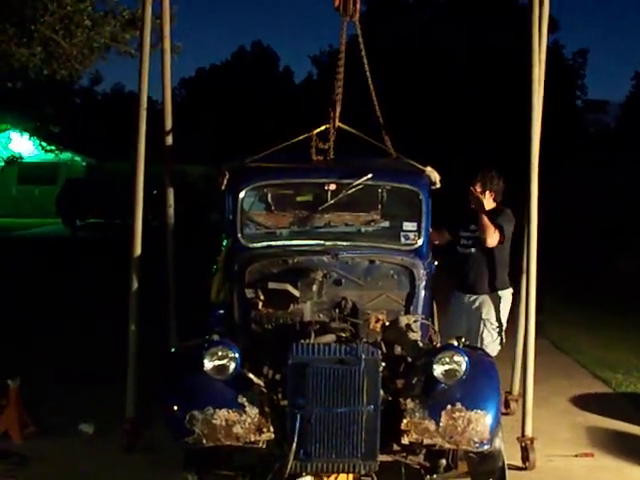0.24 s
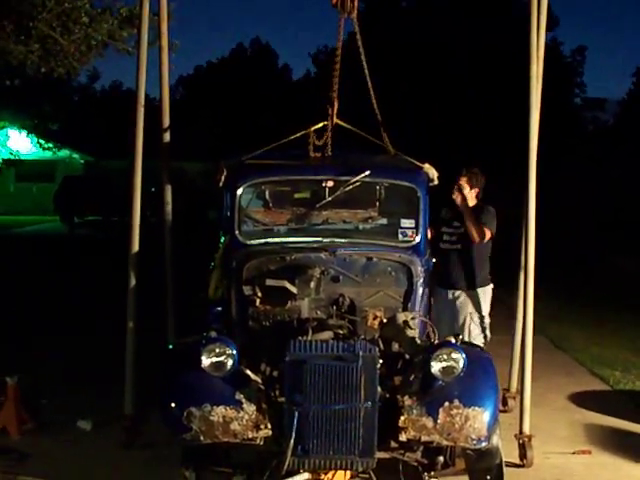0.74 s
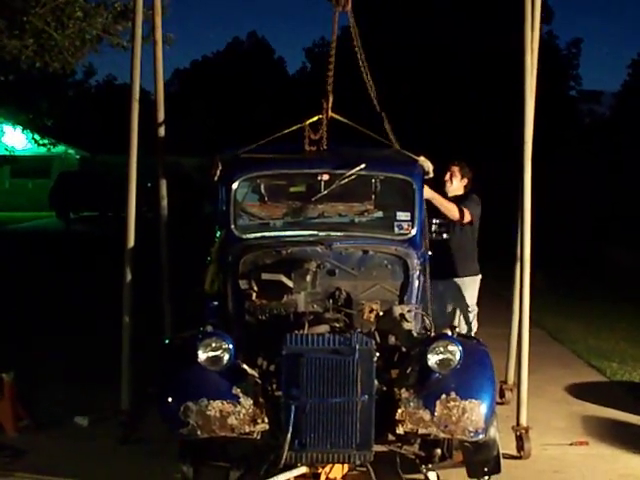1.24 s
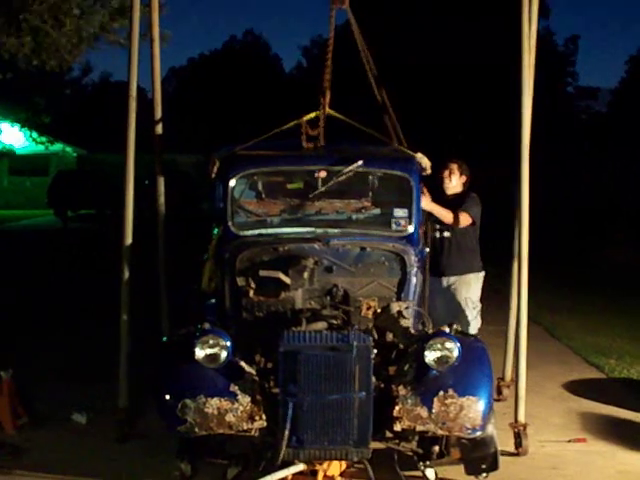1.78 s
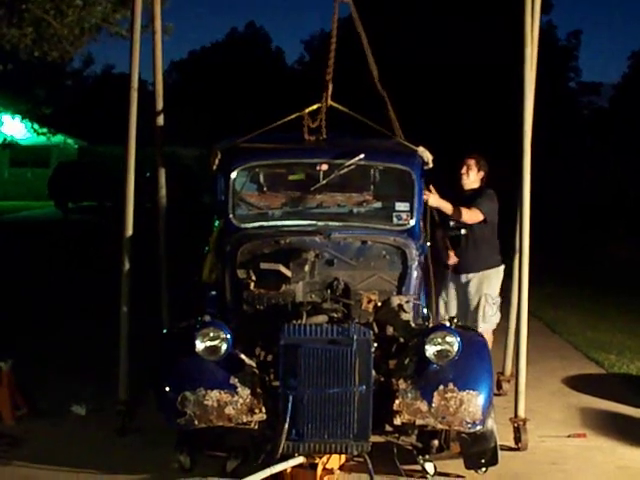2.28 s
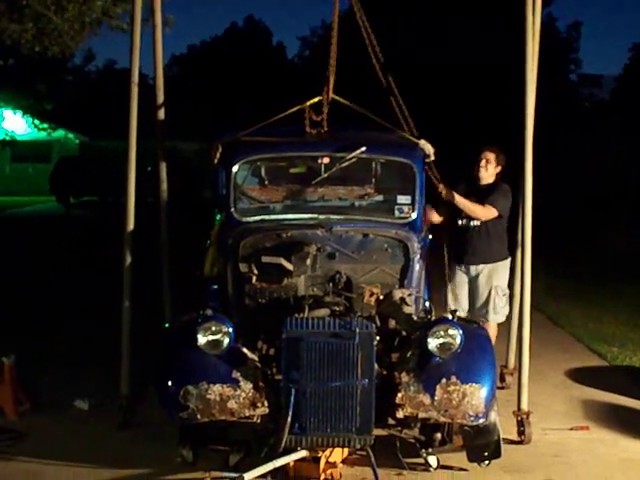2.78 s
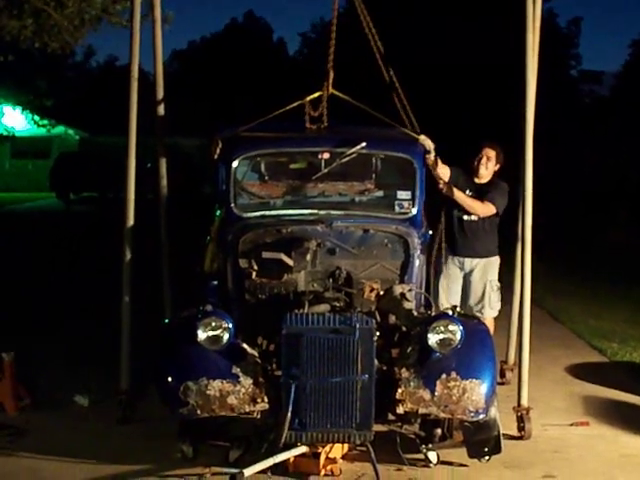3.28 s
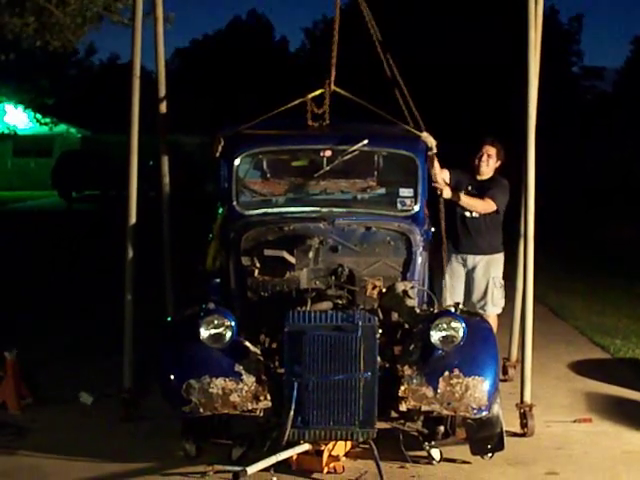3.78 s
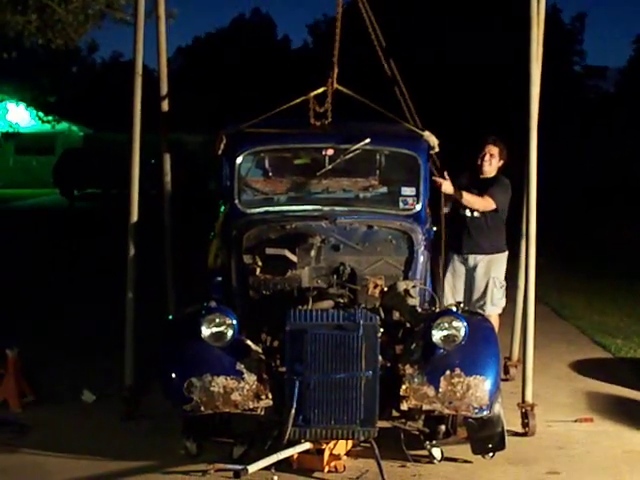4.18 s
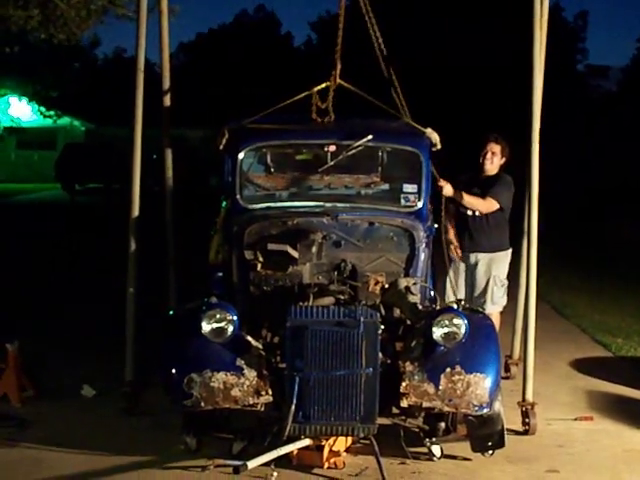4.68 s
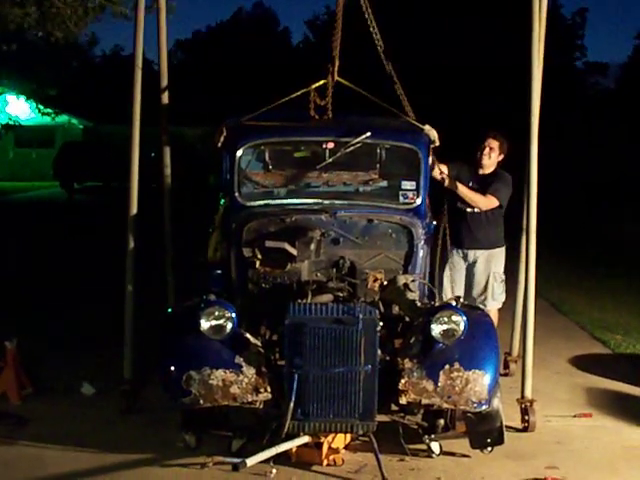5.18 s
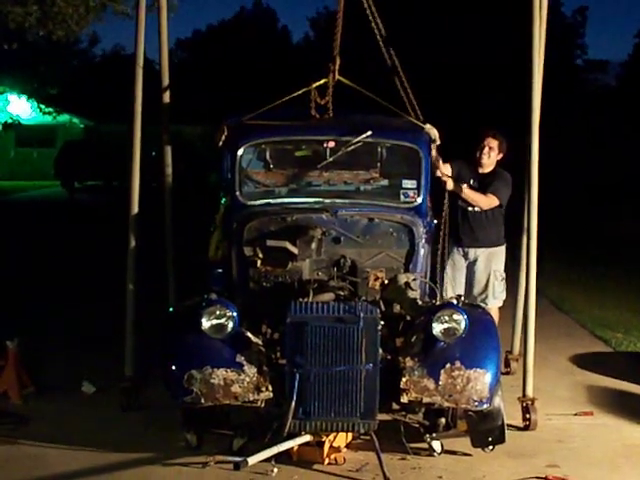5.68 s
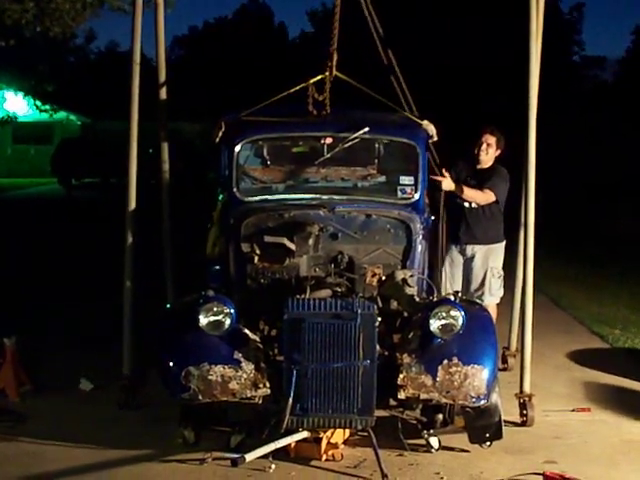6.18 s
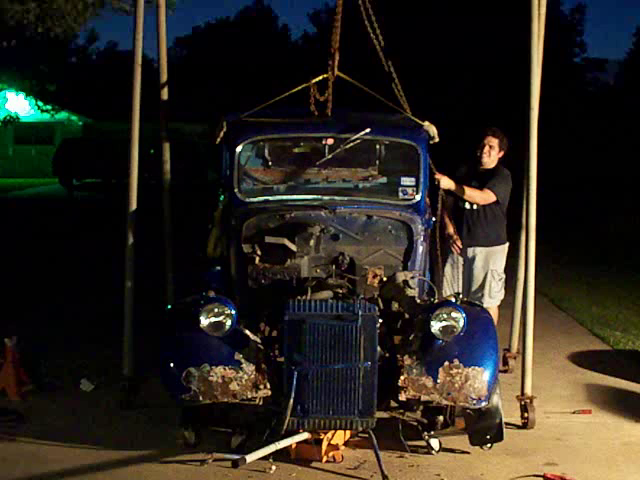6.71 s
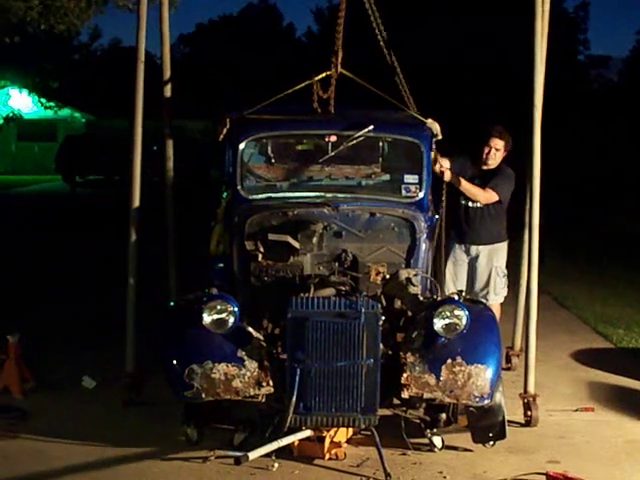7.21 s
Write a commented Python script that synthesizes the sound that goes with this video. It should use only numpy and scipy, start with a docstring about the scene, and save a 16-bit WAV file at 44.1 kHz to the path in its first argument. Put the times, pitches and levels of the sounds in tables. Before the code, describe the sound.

Outdoors at night, a hand chain hoist is pulled three times. Each pull is a run of bright, irregular link clinks, about twenty-five a second, over a ringing wheel. Between pulls the slack chain slaps and scuffs the sheet metal of the hanging old vehicle, with soft hollow jolts. Faint crickets and a low distant hum lie behind. A small camera microphone a few metres away hears short echoes off paving and walls, with dulled top treble.

```python
"""A hand chain hoist in a yard at night: in three pulls the links drop one by one into the wheel's pockets.
Between pulls the slack chain slaps the sheet metal of the hanging load, which also jolts in its slings.
Each contact is a short flurry of noise impacts that drives resonances of link, wheel and sheet metal.
Walls and paving answer; a near cricket, far crickets, a far hum and two thin whistles lie behind.
A small camera microphone with a notch in its treble listens."""
import sys
import numpy as np
from scipy import signal
from scipy.fft import rfft, irfft, next_fast_len
from scipy.io import wavfile
from scipy.ndimage import map_coordinates

SR = 44100
rng = np.random.default_rng(int(sys.argv[2]) if len(sys.argv) > 2 else 0)


def put_to_file(sound):
    """Save the sound as 16-bit audio at rate SR, in the file named by the first command-line argument."""
    columns = np.atleast_2d(sound).T  # one column per channel
    safe = np.clip(columns, -1, 1)
    whole_steps = np.round(safe * 32767)
    wavfile.write(sys.argv[1], SR, whole_steps.astype(np.int16))


N = 328545


def amp(db):
    """Decibels to linear gain."""
    return 10 ** (np.asarray(db) / 20)


def unit(x):
    """x scaled to rms 1."""
    return x / np.sqrt(np.mean(x ** 2) + 1e-20)


def along(points, hz):
    """Read (frequency, value) points on a log frequency axis."""
    f, v = np.transpose(points)
    return np.interp(np.log(hz + 1), np.log(f + 1), v)


def gains(tables):
    """One gain per sample for each level column; silent outside the tables."""
    t, out = np.arange(N) / SR, 0
    for rows in tables:
        start_s, *levels = np.transpose(rows)
        out = out + np.array([amp(np.interp(t, start_s, db, -150, -150)) for db in levels])
    return out


def wobble(rate):
    """A smooth random curve, rate knots a second."""
    knots = rng.standard_normal(int(N * rate / SR) + 4)
    return map_coordinates(knots, [np.arange(N) * rate / SR])


def filtered(x, response):
    """x times a complex response of frequency."""
    m = next_fast_len(N + SR // 2)
    return irfft(rfft(x, m) * response(np.fft.rfftfreq(m, 1 / SR)), m)[..., :N]


def coloured(x, spectrum):
    """x through a spectrum, scaled so that white noise keeps its rms."""
    hz = np.linspace(0, SR / 2, 2048)
    noise_gain = np.sqrt(np.mean(amp(along(spectrum, hz)) ** 2))
    return filtered(x, lambda f: amp(along(spectrum, f))) / noise_gain


def ringing(x, modes):
    """x through causal resonances of alternating sign, scaled so that white noise keeps its rms."""
    def response(f):
        total = 0
        for k, (hz, width, db) in enumerate(modes):
            damping = 1j * f * width
            total = total + (-1) ** k * amp(db) * damping / (hz * hz - f * f + damping)
        return total

    noise_gain = np.sqrt(np.mean(abs(response(np.linspace(0, SR / 2, 8192))) ** 2))
    return filtered(x, response) / noise_gain


def mode(x, hz, width_hz):
    """x through one resonance, scaled so that white noise keeps its rms."""
    b, a = signal.iirpeak(hz, hz / width_hz, SR)
    return signal.lfilter(b, a, x) * np.sqrt(SR / np.pi / width_hz)


def impacts(spread_db):
    """Dense tiny impacts of uneven size, rms 1."""
    return unit(rng.standard_normal(N) * amp(spread_db * wobble(400)))


def flurry(rise_ms, t60_ms):
    """Envelope of a flurry of tiny impacts that swells, then dies."""
    ms = np.arange(SR // 4) / SR * 1000
    swell = (1 - np.exp(-ms / max(rise_ms, .2))) ** 1.26
    return swell * amp(-60 * ms / max(t60_ms, 10))


def add(track, s, sound):
    """Lay a sound into a track, s seconds in."""
    track[round(s * SR):][:len(sound)] += sound


# Far hum and air: pitch_hz, level_db (per Hz, relative)
NIGHT_SPECTRUM = [(12, -33), (20, -22), (98, -13.5), (163, -6), (286, -8.5), (342, -6.5), (570, -8),
                  (699, -4.5), (1000, -11.5), (3240, -20.5), (3590, -22.5), (4290, -31.5), (6800, -16.5),
                  (8130, -26.5), (9010, -47.5), (11700, -59.5), (19800, -120)]
# Thin whistles: pitch_hz, level_db (rms, before their slow unevenness)
WHISTLE_TONES = [(7827, -81), (8172, -85)]
HUM_DB = -60.5  # far traffic


def night():
    """Far traffic hum and air as shaped noise, slowly uneven, with two thin wavering whistles."""
    t = np.arange(N) / SR
    whistles = 0
    for pitch_hz, level_db in WHISTLE_TONES:
        whistles = whistles + np.sqrt(2) * amp(level_db + wobble(3.7)) * np.sin(2 * np.pi * pitch_hz * t)
    hum = amp(HUM_DB + 0.47 * wobble(1.8)) * coloured(rng.standard_normal(N), NIGHT_SPECTRUM)
    return hum + whistles


# Far crickets, level points: start_s, level_db
FAR_CHORUS = [(0, -90), (.6, -95), (2.6, -76), (3.5, -76.5), (4.8, -76), (5.7, -75), (6.8, -73),
              (7.0, -73.5), (7.45, -74)]
# Near cricket, chirps: start_s
NEAR_CHIRPS = [.06, .3, .55, .79, 1.04, 1.28, 1.51, 2.93, 3.39, 3.6, 4.86, 5.08, 5.5, 5.71, 6.85, 7.06, 7.3]
CHIRP_DB = -67


def crickets():
    """A near cricket scrapes trains of pulses; far ones merge into a narrow band of noise."""
    t, gate = np.arange(N) / SR, np.zeros(N)
    for start_s in NEAR_CHIRPS:
        u = np.clip((t - start_s) / 0.12, 0, 1)  # a chirp lasts 0.12 s
        gate += amp(CHIRP_DB) * np.abs(np.sin(np.pi * u)) ** 0.2 * (u < 1)
    strokes = 1 + 0.47 * np.sin(2 * np.pi * 45 * t + wobble(5.4))  # about 45 a second
    near = ringing(gate * strokes * rng.standard_normal(N), [(6970, 27, 0)])
    band = ringing(rng.standard_normal(N), [(3520, 74, 0)])
    far = gains([FAR_CHORUS])[0] * amp(1.5 * wobble(4.7)) * band
    return near + far


# Echo of the yard: pitch_hz, t60_s
YARD_DECAY = [(200, 1), (1400, 0.37), (4000, 0.38), (9000, 0.26)]


def yard(x):
    """Walls, paving and hanging steel answer; each frequency dies at its own speed."""
    hz, t, z = signal.stft(rng.standard_normal(SR // 2), SR, nperseg=256)
    decay = amp(-60 * t / along(YARD_DECAY, hz)[:, None])
    tail = signal.istft(z * decay, SR, nperseg=256)[1]
    delayed = np.pad(x, (400, 0))  # the echo starts 9 ms late
    return signal.fftconvolve(delayed, tail / np.linalg.norm(tail))[:N]


# Sheet metal of the load, clear modes: pitch_hz, width_hz, level_db (relative)
PANEL_MODES = [(356, 15, -17), (756, 12, 7.5), (851, 27, -1.5), (1205, 48, 7.5), (1370, 180, -14),
               (1678, 45, 9.5), (2324, 110, -13), (2670, 58, -8.5), (3144, 30, -15)]
# Sheet metal of the load, dense modes: pitch_hz, level_db (per Hz, relative)
SHEET_SPECTRUM = [(130, -42), (220, -12), (576, 0), (1250, -0.5), (1460, 0), (2560, -5.5), (2850, -9),
                  (3230, -11.5), (4140, -27.5), (4770, -16.5), (7480, -10.5), (9010, -60), (11700, -74),
                  (19800, -120)]


def load(knock):
    """Knocks ring the few clear modes of the sheet metal and colour its many dense ones."""
    return amp(-8.5) * ringing(knock, PANEL_MODES) + amp(-2) * coloured(knock, SHEET_SPECTRUM)


# Hollow body of the load: pitch_hz, level_db (per Hz, relative)
BODY_SPECTRUM = [(35, -62.5), (60, -30), (134, -15), (166, -11), (279, -7), (784, 0), (879, -1.5),
                 (2720, -13), (3000, -16.5), (3900, -41), (6600, -120)]
# The load jolts in its slings: start_s, level_db (relative), rise_ms, t60_ms, boom_pitch_hz,
# boom_level_db (relative)
JOLTS = [(0.428, -43, 17, 360, 303, -81), (1.899, -51, 10, 320, 235.7, -60),
         (2.13, -31, 2, 124, 234, -54.5), (4.293, -32, 5.3, 300, 315, -54),
         (4.601, -26.5, 15, 270, 140.5, -57.5), (4.818, -41.5, 4.9, 92, 252, -78),
         (5.884, -39, 5.2, 330, 228, -59)]


def thuds():
    """Soft jolts rumble and boom in the hollow body."""
    push, boom, t = np.zeros(N + SR), np.zeros(N + SR), np.arange(SR // 4) / SR
    for start_s, level_db, rise_ms, t60_ms, boom_hz, boom_db in JOLTS:
        add(push, start_s, amp(level_db - 6) * flurry(rise_ms, t60_ms))
        add(boom, start_s, amp(boom_db + 4) * flurry(12, 350) * np.sin(2 * np.pi * boom_hz * t))
    push = push[:N] * impacts(spread_db=2.5)
    return coloured(push, BODY_SPECTRUM) + amp(-5.5) * ringing(push, PANEL_MODES) + boom[:N]


# Single dry ticks of one link: start_s, level_db (relative), pitch_hz, crack_db (over the ring)
LINK_TICKS = [(1.484, -31.5, 1460, 5), (1.566, -34, 2890, -7), (2.781, -50, 1170, 2),
              (4.7717, -43, 2600, -3), (4.8228, -44, 990, 22), (4.853, -53, 1180, -3),
              (5.0335, -41, 1060, -9), (5.4182, -36.5, 1030, 17), (5.6316, -44, 1970, -11),
              (5.732, -34, 2700, 0), (6.7056, -28, 2820, -2)]


def ticks():
    """One link touches another: a crack and a few cycles of ring, with softened treble."""
    out, t = np.zeros(N + SR), np.arange(SR // 20) / SR
    for start_s, level_db, pitch_hz, crack_db in LINK_TICKS:
        crack = amp(crack_db - 60 * t / 0.002) * rng.standard_normal(len(t))
        ring = amp(-60 * t / 0.019) * np.sin(2 * np.pi * pitch_hz * t)
        add(out, start_s, amp(level_db - 8.0) * (ring + crack))
    return filtered(out[:N], lambda f: 1 / (1 + 1j * f / 4500))


# The wheel sings as the slack is taken up: start_s, length_s, pitch_hz, level_db (before the flutter)
TAKE_UP_TONES = [(1.514, .13, 2074, -66), (3.537, 0.29, 2036, -66.5), (5.62, 0.27, 1943, -68.5)]


def take_up():
    """A thin, unsteady tone of the rim as each pull takes up the slack."""
    t = np.arange(N) / SR
    cycles = np.cumsum(np.exp(.02 * wobble(30))) / SR
    tones = 0
    for start_s, length_s, pitch_hz, level_db in TAKE_UP_TONES:
        fade = np.clip(np.minimum(t - start_s, start_s + length_s - t) / .015, 0, 1)
        tones = tones + amp(level_db) * fade * np.sin(2 * np.pi * pitch_hz * cycles)
    return tones * amp(4.5 * wobble(45)) * np.sqrt(2)


# Hoist wheel and cover: pitch_hz, width_hz, level_db (relative)
WHEEL_MODES = [(636.3, 26.5, -8.5), (903, 22, -16.5), (1183, 41, -6.5), (1698, 83, -3), (1840, 57, -24),
               (2550, 33, -8), (2847, 74, 1.5), (3023, 84, 1), (3037, 28, -13), (3642, 50, -5),
               (4633, 44, -8.5), (5580, 100, -5), (7270, 24, -33), (7240, 22, -14)]
# The purest ring of the wheel: pitch_hz, width_hz, level_db
RIM_MODE = [(2055, 27, 0)]
RIM_HUM_DB = -1.5  # running ring of the rim, over the drive of the wheel


def wheel(shake, running):
    """As the wheel turns, links strike new places and favour other modes; the running chain hums the rim."""
    shaken = shake * impacts(spread_db=4.0)
    ring = 0
    for pitch_hz, width_hz, level_db in WHEEL_MODES:
        ring = ring + amp(level_db - 6.5 + 1.9 * wobble(22)) * mode(shaken, pitch_hz, width_hz)
    return ring + ringing(amp(RIM_HUM_DB) * running * impacts(spread_db=1.0), RIM_MODE)


# Links: pitch_hz, level_db (per Hz, relative)
CLINK_SPECTRUM = [(180, -35.5), (300, -16), (460, -63), (611, -8), (1540, -5.5), (2020, 3.5), (2360, -6.5),
                  (3050, 1), (4180, -10), (4550, -6.5), (7070, 4.5), (8040, -2.5), (9010, -42),
                  (11700, -83.5), (19800, -120)]
# Bunched slack links: pitch_hz, width_hz, level_db
SLACK_MODE = [(2570, 410, 0)]


def links(clink, jangle):
    """Hard links clink as bright coloured noise; bunched slack links jangle in one broad band."""
    bright = coloured(clink * impacts(spread_db=2.5), CLINK_SPECTRUM)
    return bright + ringing(jangle * impacts(spread_db=4.5), SLACK_MODE)


# A link drops into a pocket of the wheel: start_s, clink_db (relative), wheel_ring_db (relative to
# the clink), rim_strike_db (relative), rise_ms
LINK_DROPS = [(1.6327, -34, 6.5, -45, 2.8), (1.6526, -30, -3, -44, 3.2), (1.6866, -29, 2, -41, 4),
              (1.7454, -33.5, -4, -52, 5.1), (1.7633, -24.5, -5, -37, 3.1), (1.817, -25.5, -1, -58, 3.2),
              (1.8816, -26, -14, -43, 1.5), (1.9285, -27, -1, -45.5, 3.4), (1.9584, -34.5, -14, -41, 2.2),
              (1.9919, -25, -3, -46, 2.5), (2.0365, -28, -9, -51, 4.5), (2.0837, -21.5, -8, -42, 3.7),
              (2.1256, -20, -11, -34, 2.8), (2.167, -23, -2.5, -39, 2.8), (2.1934, -25, -16, -38, 1.8),
              (2.2253, -22, -19, -38, 3.1), (2.2752, -20, -10, -34, 2.3), (2.3114, -27, -5, -43, 2.8),
              (2.3565, -22, -2.5, -48, 4.4), (2.3794, -27, -7, -50, 4.2), (2.4193, -27.5, 2, -50, 3.6),
              (2.4484, -35.5, 5, -44, 2.8), (3.7184, -38.5, -4, -57, 3.1),
              (3.7329, -27.5, -1.5, -30.5, 3.4), (3.7775, -19.5, -11.5, -47, 2.5),
              (3.8084, -32, -1, -42, 3.2), (3.8387, -19.5, -9, -46, 4.1), (3.8874, -22.5, -4, -40, 1.8),
              (3.933, -24.5, -7, -47, 4), (3.9908, -25, -4, -48, 2), (4.0422, -24, -4, -38, 2.4),
              (4.0833, -25.5, -7, -37, 2.5), (4.1111, -30.5, -14, -35, 2.8), (4.1234, -21.5, -8, -43, 2.8),
              (4.1535, -25, -10, -44, 4.3), (4.1994, -21, -4, -33, 1.6), (4.2353, -26, -20, -45, 3.3),
              (4.2657, -19, -11.5, -31.5, 3.7), (4.3036, -23.5, 2.5, -30.5, 2.8),
              (4.3311, -22, -1, -38, 3.8), (4.374, -20.5, -9, -46, 2.3), (4.4054, -25.5, -8, -38, 3.2),
              (4.4398, -20.5, -15, -34, 3.4), (4.4862, -23, -8, -43, 3.6), (4.5342, -27, -8, -49, 2.6),
              (4.5795, -32, 1, -49, 2.8), (5.805, -36, -6.5, -44, 3.2), (5.8164, -19, -3, -44, 7.5),
              (5.8814, -29.5, -13, -37, 2.8), (5.903, -19.5, -12, -33, 5), (5.9406, -28, -12, -47, 2.8),
              (5.9574, -25.5, -5, -47, 3), (6.0196, -23.5, -6, -32.5, 0.93), (6.0593, -23, -5, -40, 2.3),
              (6.111, -22.5, -10, -40, 3.1), (6.1544, -24.5, -6, -42, 3.8), (6.2008, -21, -22, -36, 2),
              (6.2134, -32, -11, -32, 2.8), (6.2392, -21.5, -17, -35, 2.8), (6.2743, -25, -14, -39, 1.3),
              (6.3185, -21.5, -8, -36, 1.6), (6.3684, -22, -8, -38, 2.8), (6.3984, -28, -0.5, -35, 2.8),
              (6.4333, -20.5, -16, -37, 2.8), (6.4722, -23, -20, -38, 2.5), (6.5136, -20, -11, -32.5, 3.5),
              (6.5555, -28.5, -7, -48, 2.4), (6.5755, -25, -16, -40, 3.1), (6.6223, -26, -9, -53, 3.6),
              (6.6354, -28, -6, -36, 3.5), (6.7034, -40, 3, -52, 2.8)]
RIM_SCATTER = .006  # spread of log pitch from strike to strike
RIM_LAG_S, RIM_T60_MS, RIM_PEAK_DB = .005, 68, 5  # a strike comes late; its peak over the table level


def rim_strikes():
    """Every dropping link makes the rim sing briefly, a decaying sine just after the clink."""
    out, t = np.zeros(N + SR), np.arange(SR // 4) / SR
    for start_s, _, _, strike_db, _ in LINK_DROPS:
        hz = RIM_MODE[0][0] * np.exp(RIM_SCATTER * rng.standard_normal())
        tone = np.sin(2 * np.pi * (hz * t + rng.random()))
        add(out, start_s + RIM_LAG_S, amp(strike_db + RIM_PEAK_DB) * flurry(1.9, RIM_T60_MS) * tone)
    return out[:N]


# Chain running, one list a pull: start_s, rattle_db, wheel_db, panel_db (all relative)
PULLS = [
    [(1.55, -77, -72, -69), (1.674, -52, -60, -40), (1.818, -42.5, -43, -38), (1.984, -40, -38, -36.5),
     (2.19, -40.5, -39, -47), (2.314, -44, -40, -52), (2.53, -57.5, -68, -59), (2.7, -63.5, -77, -63)],
    [(3.55, -77, -65, -71), (3.782, -68, -51.5, -46.5), (3.914, -47.5, -46, -63),
     (4.312, -36.5, -40.5, -56), (4.44, -36, -39.5, -39), (4.584, -48, -58, -50), (4.756, -64, -81, -61),
     (4.9, -74, -86, -70)],
    [(5.6, -78, -70, -65), (5.82, -56, -63, -68), (5.998, -53.5, -45, -47), (6.254, -38, -46.5, -56),
     (6.454, -39.5, -40, -44), (6.552, -47.5, -44, -56), (6.714, -57.5, -64, -50.5), (6.9, -73, -84, -77)],
]
# Slack chain scuffing the load: start_s, level_db (relative)
SCUFFS = [
    [(0.9, -60), (0.988, -51.5), (1.138, -52), (1.386, -53), (1.5, -71)],
    [(2.75, -100), (3.064, -50.5), (3.192, -47.5), (3.34, -63.5), (3.5, -48.5)],
    [(4.9, -77), (5.05, -73), (5.6, -71)],
    [(7.05, -72), (7.154, -43), (7.308, -56.5), (7.45, -53)],
]
# Slack chain slaps the load: start_s, clink_db (relative), jangle_db and panel_knock_db (relative to
# the clink), rise_ms, pitch_hz
CHAIN_SLAPS = [(0.9453, -48, -10, 8, 2.8, 6650), (0.9824, -54, -10, 5, 2.8, 6770),
               (1.0454, -53, -15, 4, 2.5, 6920), (1.065, -43.5, -18, 7, 3, 7300),
               (1.1074, -50, -12, 7.5, 2.46, 6520), (1.1463, -47, -4, 1, 2.5, 6260),
               (1.2056, -38, 4.5, 1, 3.4, 7430), (1.3598, -42, -5, 0, 1.9, 7010),
               (1.5625, -45.5, -12, -2, 2.8, 6850), (2.553, -39.5, -27, 0, 2.8, 7000),
               (2.6585, -50.5, -10, 1, 2.8, 7420), (2.802, -50, -14, -5, 2.1, 6900),
               (2.8215, -44.5, -19, -7, 3.2, 7260), (3.018, -24, -10, 2, 1.7, 7730),
               (3.1333, -36, -14, 0, 2.1, 7720), (3.1504, -26, -16, 1, 2.3, 7380),
               (3.2616, -31, -17, 0, 2.7, 6490), (3.2928, -41, -10, 10, 2.7, 6940),
               (3.4092, -60, -17, -3, 2.5, 7830), (3.528, -54.5, -8, 14.5, 2.5, 6950),
               (3.5655, -41, -12, -1.5, 2.5, 7400), (3.5867, -40, -3, -6.5, 2, 6560),
               (3.6406, -55, -6, 2, 2.1, 6940), (4.7461, -48, -6, 4, 2.9, 6700),
               (4.9496, -47, -6, 5, 2.3, 7130), (4.9735, -52, -10, 2, 3, 6980),
               (5.226, -41, 2.5, 8, 2.3, 7500), (5.245, -45, -5, 4.5, 3.4, 7080),
               (5.2894, -48, -8, 6, 2.8, 7510), (5.3532, -33, -20, 1.5, 2.5, 6090),
               (5.715, -48, -5, -3, 2.7, 7600), (5.7319, -46, -3, -2.5, 1.8, 7260),
               (7.1001, -29, -2, 7.5, 2, 6530), (7.3588, -30.5, -24, -4, 2.4, 7390)]
LINK_HZ, LINK_SCATTER, CLINK_T60_MS = 6910, 0.068, 92.9  # link pitch, spread of its log, base decay
POCKET_KNOCK_DB = -34.5  # a dropping link heard through the load, relative to the clink


def chain():
    """Links clink, shake the wheel and knock the load; the running chain rattles between the contacts."""
    clink, shake, knock = amp(-4.5) * np.pad(gains(PULLS), ((0, 0), (0, SR)))
    running = shake.copy()
    pings, jangle = np.zeros((2, N + SR))
    pitches = LINK_HZ * np.exp(LINK_SCATTER * rng.standard_normal(len(LINK_DROPS)))
    contacts = []
    for (start_s, db, ring_db, _, rise_ms), hz in zip(LINK_DROPS, pitches):
        contacts.append((start_s, db, shake, ring_db, POCKET_KNOCK_DB, rise_ms, hz))
    for start_s, db, *rest in CHAIN_SLAPS:
        contacts.append((start_s, db, jangle, *rest))

    for start_s, db, ring, ring_db, panel_db, rise_ms, hz in contacts:
        s = start_s - .4 * rise_ms / 1000  # the swell starts softly, ahead of the heard onset
        add(clink, s, amp(db - 7.0) * flurry(rise_ms, CLINK_T60_MS))
        # heavier parts answer longer
        add(ring, s, amp(db + ring_db - 12.5) * flurry(rise_ms, 1.83 * CLINK_T60_MS))
        add(knock, s, amp(db + panel_db - 8.5) * flurry(rise_ms, 1.85 * CLINK_T60_MS))
        # each link has its own pitch
        burst = flurry(rise_ms, 0.36 * CLINK_T60_MS) * rng.standard_normal(SR // 4)
        add(pings, s, amp(db - 1.5) * mode(burst, hz, width_hz=350))

    knock = (knock[:N] + amp(-5.5) * gains(SCUFFS)[0]) * impacts(spread_db=2.0)
    steel = links(clink[:N], jangle[:N]) + pings[:N]
    return steel + load(knock) + wheel(shake[:N], running[:N])


def scene():
    """The hoist and its load, their echo in the yard, and the night around them."""
    steel = chain() + rim_strikes() + take_up() + thuds() + ticks()
    return (steel + amp(-7.0) * yard(steel) + crickets() + night())[None]


TOP_HZ = 9200  # band limit of the microphone


def record(dry):
    """The microphone housing cancels a band of the treble; only faint hiss passes above the band limit."""
    def response(hz):
        notch = 1 - 0.87 / (1 + ((hz - 4200) / 200) ** 2)
        slope = amp(-.045 * np.clip(hz - 8600, 0, None))  # falls steeply near the limit
        return notch * slope * (hz < TOP_HZ)

    hiss = amp(-102) * rng.standard_normal(dry.shape)
    return filtered(dry, response) + hiss


dry = scene()
out = record(dry)
put_to_file(out)
```